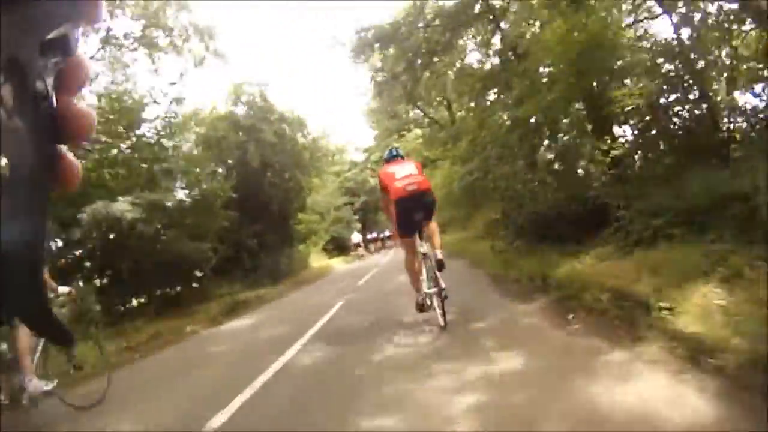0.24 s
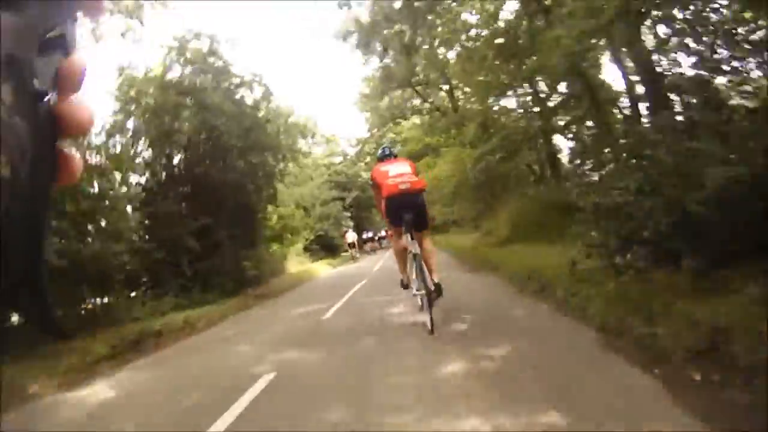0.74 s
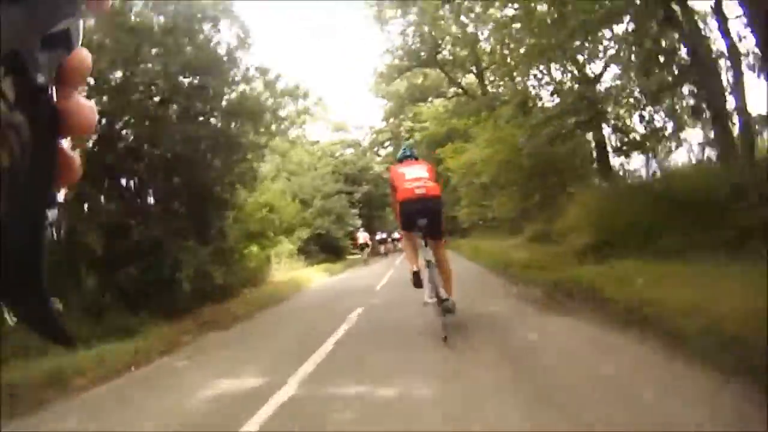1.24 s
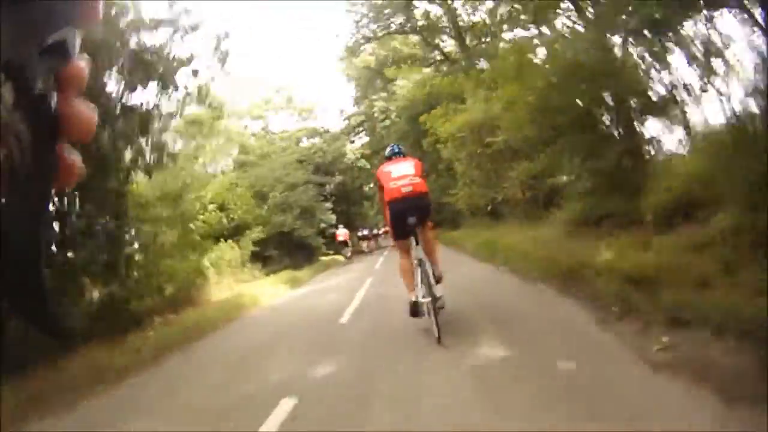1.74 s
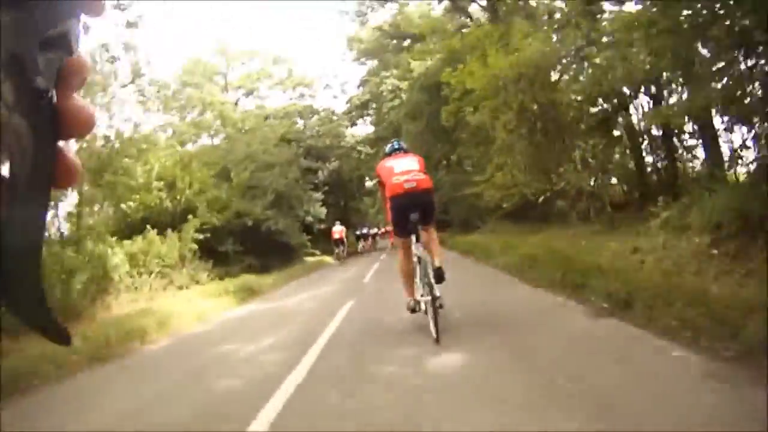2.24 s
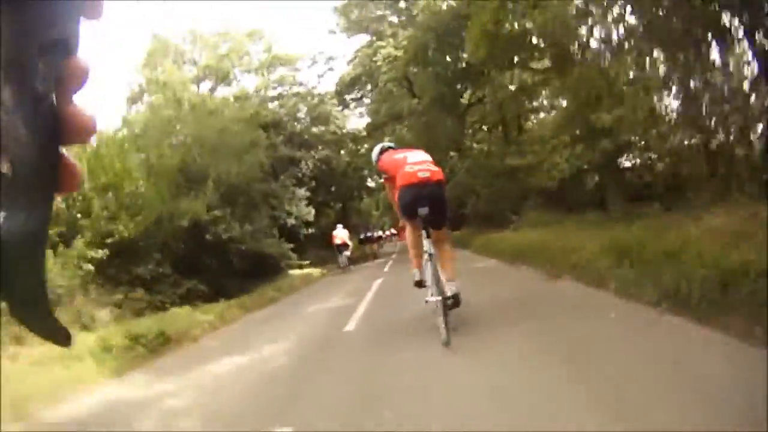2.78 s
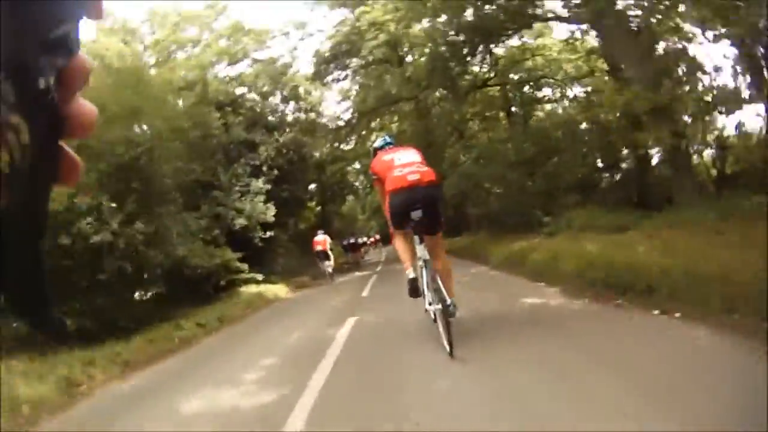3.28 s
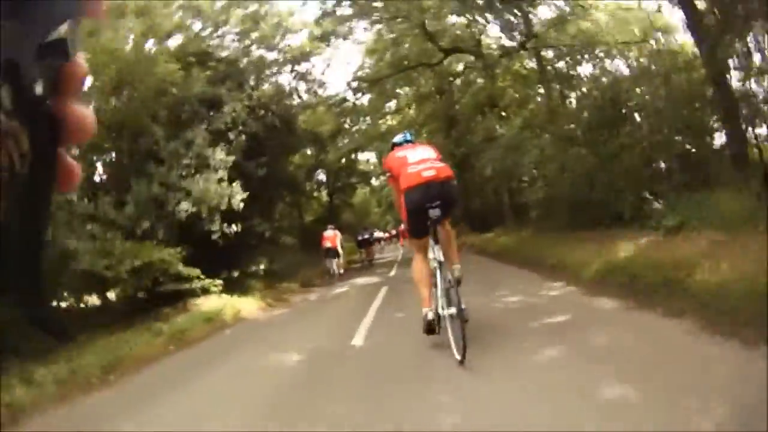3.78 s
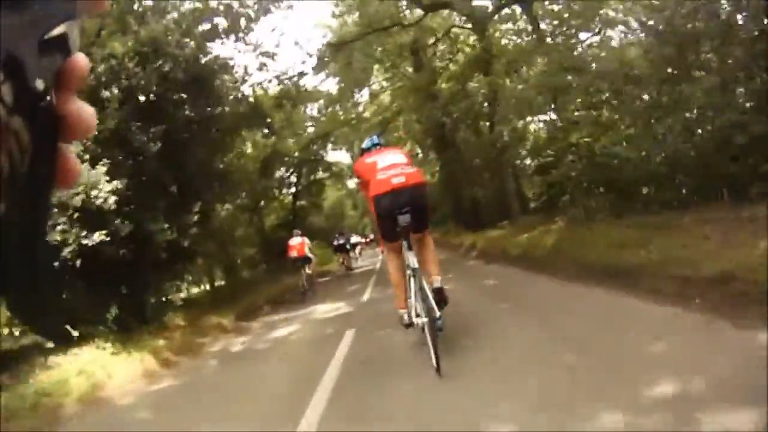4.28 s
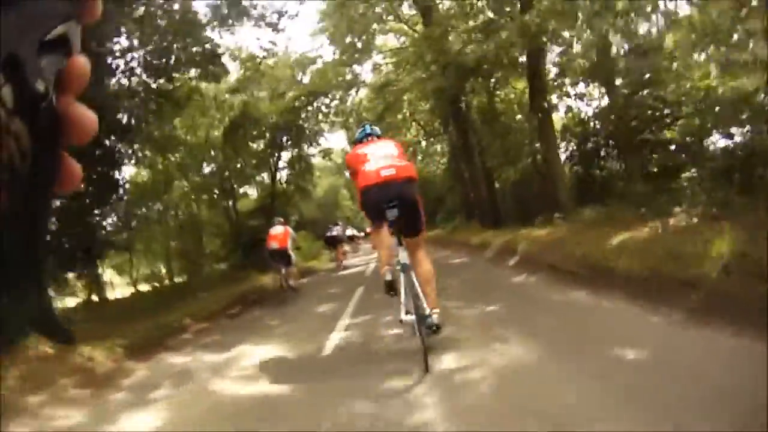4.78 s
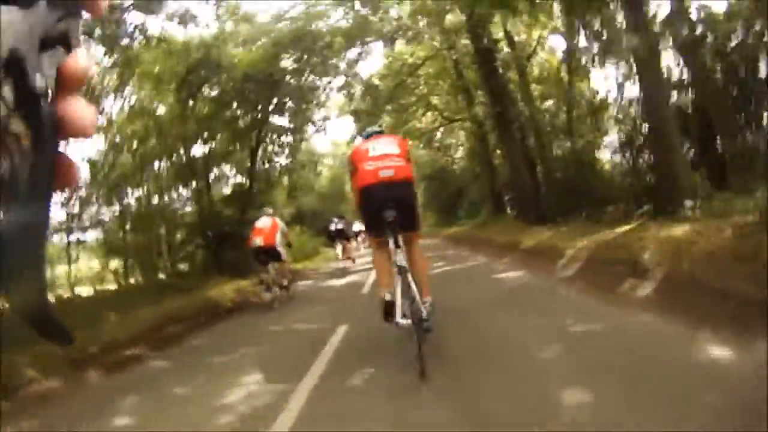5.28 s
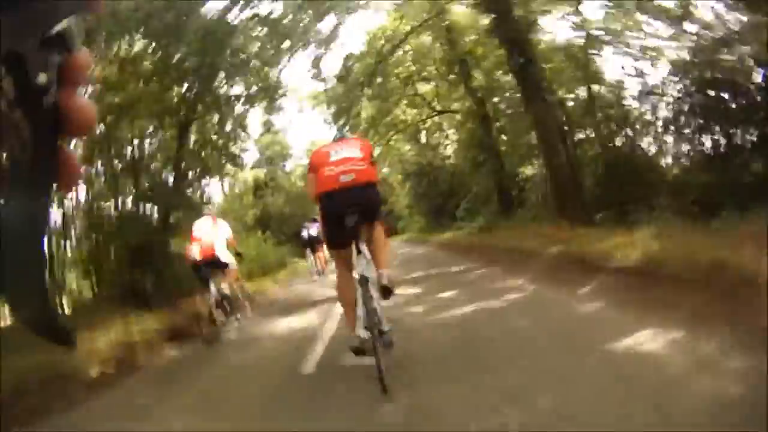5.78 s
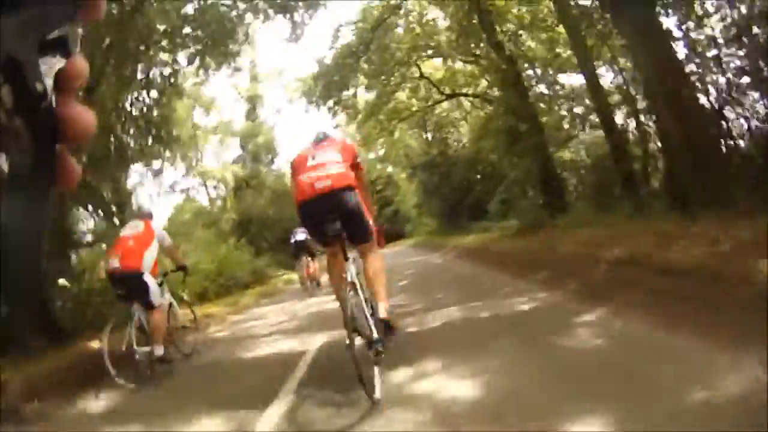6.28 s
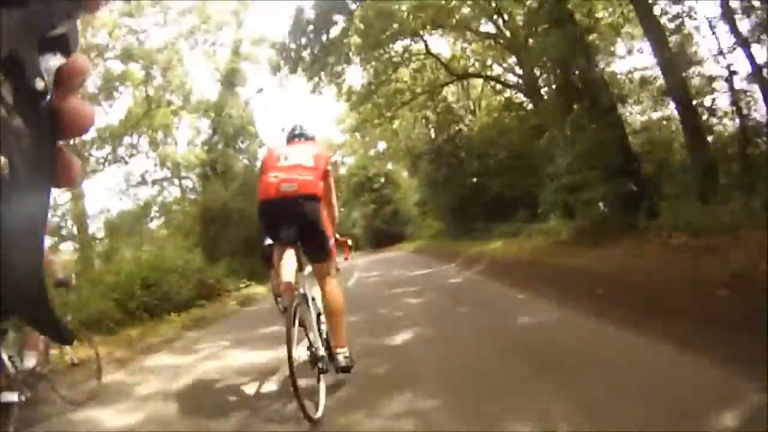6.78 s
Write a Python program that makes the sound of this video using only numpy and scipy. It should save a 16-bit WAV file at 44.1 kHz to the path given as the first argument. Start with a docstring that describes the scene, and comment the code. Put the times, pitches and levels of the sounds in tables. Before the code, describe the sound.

Hollow plastic knocks and gritty chatter burst irregularly over the steady dull rumble of a bicycle riding a rough paved lane, heard from the handlebar.

```python
"""A camera in a closed plastic case on a handlebar knocks and chatters as a road bike rolls along a tarmac lane.
Each bump throws it against one wall and back against the other: paired impulses of opposite sign excite the case.
Smaller jolts give single blows, and the road's grain drives panel resonances and fine crackling grit.
Hard edges tick, metal pings, a loose part clacks and parts scrape: short forces on damped resonators.
Below lies the rumble of tyres and frame, random contacts shaped by a spectrum, with the mount humming along."""
import sys
import numpy as np
from scipy import signal
from scipy.fft import rfft, irfft
from scipy.io import wavfile

SR = 44100
rng = np.random.default_rng(int(sys.argv[2]) if len(sys.argv) > 2 else 0)


def store_wav(level_fs):
    """Save 16-bit WAV to argv[1]."""
    pcm = np.round(np.clip(np.atleast_2d(level_fs), -1, 1) * 32767)
    wavfile.write(sys.argv[1], SR, pcm.T.astype(np.int16))


N = 310023
T = np.arange(N) / SR  # time in seconds

# Bumps that throw the camera. Each row: first return blow in seconds, its level in dB, level of the
# opening blow in dB, extra shaking in dB (only positive values act), number of throws.
BUMPS = [(0.0917, -6.5, -11, 2.5, 1), (0.157, -22, -6, 5.5, 1), (0.21, -16, -11, 15.5, 1),
         (0.2345, -10, -5.5, 12, 1), (0.515, -10.5, -14, 12, 2), (0.668, -15.5, -13, 2.5, 1),
         (1.1092, -7, -8.5, 15.5, 1), (1.2249, -6, -7, 3, 2), (1.359, -7.5, -13, 5, 2),
         (1.8216, -8, -11, 14, 2), (2.1387, -5, -10, 13, 1), (2.3841, -12.5, -14, 5.5, 1),
         (2.544, -18, -11, 7.5, 1), (2.642, -11, -26, 8.5, 2), (2.775, -8.5, -16, 9.5, 2),
         (2.824, -4, 1, -33, 1), (2.845, -1.5, 0.5, -2, 1), (2.938, -7, -6, 5.5, 1),
         (2.955, -16, -6, -9, 2), (2.9981, -3, -5, 4, 1), (3.063, -11, -20, -6, 1),
         (3.0823, -4, -5.5, 4.5, 1), (3.144, -6.5, -14, 4.5, 2), (3.1857, -6, -4, -4, 1),
         (3.208, -15, -7.5, 0.5, 1), (3.235, -10, -7.5, -4, 1), (3.744, -7.5, -6, -2.5, 2),
         (3.845, -4.5, -6, 2, 2), (4.1109, -10, -12, 8.5, 1), (4.2066, -18, -15, 4.5, 3),
         (4.4869, -14, -23, 13.5, 1), (4.691, -14, -19, 9, 1), (4.9172, -11, -9.5, 7.5, 1),
         (5.1001, -17, -10, -1, 1), (5.2853, -11.5, -14, 0.5, 1), (5.369, -9, -11, 4, 1),
         (5.461, -9.5, -10, 5, 2), (5.5465, -6.5, 3.5, 15.5, 2), (5.859, -13, -7, 5, 1),
         (6.1, -3, -6.5, 3.5, 1), (6.468, -14, -4.5, 6.5, 2), (6.6151, -0.5, 4.5, -5, 4),
         (6.7007, -4, -3, -9, 1), (6.758, -13, -11, 2, 3), (6.9942, -7, -3, 13, 1)]
# Response of the case to a blow. Each row: frequency in Hz, relative level in dB.
BLOW_SPECTRUM = [(35, -21.5), (70, -6.5), (135, -5.5), (200, 5), (420, 0), (700, -2), (1100, -5),
                 (1600, -18.5), (2700, -24), (3400, -34.5), (6500, -43.5), (11000, -53)]
# Fine grit between the rubbing plastic faces. Each row: frequency in Hz, relative level in dB.
GRIT_SPECTRUM = [(700, -1), (2400, 6), (3500, -4), (6000, -7), (11000, -23)]
# Resonances of the case panels. Each row: frequency in Hz, width in Hz, relative level in dB.
PANEL_MODES = [(308, 207, 0.5), (538, 514, -0.5), (911, 500, 2.5), (1235, 320, -4.5), (1582, 346, -7.5),
               (2480, 650, -14.5)]
# Ring of the handlebar mount. Each row: frequency in Hz, width in Hz, relative level in dB.
MOUNT_MODES = [(293.3, 47, -5.5)]
BOUNCE_HZ = 46.67  # how often the mount bounces after a jolt


def undb(db):
    """Amplitude gain is ten to the power of decibels over twenty."""
    return 10 ** (np.asarray(db) / 20)


def unit(x):
    """Normalise the effective value: rms 1."""
    return x / np.sqrt(np.mean(x ** 2))


def walk(rate):
    """Random fluctuation: `rate` normal values a second joined by straight lines; rms 1."""
    values = rng.standard_normal(4096)
    return unit(np.interp(T * rate, np.arange(4096), values))


def taps(times, sizes):
    """Ideal impacts: one impulse at each time in seconds."""
    samples = np.clip(times * SR, 0, N - 1).astype(int)
    return np.bincount(samples, sizes, N)


def grains(rate, scatter_db):
    """Shot noise: random contacts, `rate` a second, of uneven size and either direction; rms 1."""
    hit = rng.random(N) < rate / SR
    direction = rng.choice([-1, 1], N)
    size = undb(scatter_db * np.clip(rng.standard_normal(N), -2, 1))
    return unit(hit * direction * size)


def spurts(impulses, decay_s):
    """Exponential relaxation: each impulse starts a spurt that dies away."""
    # the tiny offset keeps the filter state from vanishing
    return signal.lfilter([1], [1, -np.exp(-1 / (decay_s * SR))], impulses + 1e-18)


def jolts(rate, decay_s):
    """Fluctuating contact pressure: decaying random jolts, `rate` a second; mean 1."""
    pressure = spurts(np.abs(grains(rate, scatter_db=-0.5)), decay_s)
    return pressure / pressure.mean()


def response(points, size=4096):
    """Minimum phase: the causal impulse response, peak 1, of a spectrum of (Hz, dB) points."""
    hz, db = np.transpose(points)
    grid = np.maximum(np.arange(size // 2 + 1) * SR / size, 1)
    level_db = np.interp(np.log(grid), np.log(hz), db)
    # folding the cepstrum onto positive times makes the response causal
    cepstrum = irfft(np.log(undb(level_db)))
    cepstrum[1:size // 2] *= 2
    cepstrum[size // 2 + 1:] = 0
    h = irfft(np.exp(rfft(cepstrum)))
    return h / np.abs(h).max()


def colour(x, points):
    """Linear response: convolve a force with the impulse response of a body."""
    return signal.fftconvolve(x, response(points))[:N]


def ring(x, modes):
    """Modal superposition: sum of resonances (Hz, width Hz, dB)."""
    out = 0
    for hz, width, db in modes:
        resonator = signal.iirpeak(hz, hz / width, fs=SR)
        out = out + undb(db) * signal.lfilter(*resonator, x)
    return out


def band(x, hz, width, order=2):
    """Heavily damped resonance: a band-pass of given width, its edges held below SR / 4."""
    edges = np.minimum(hz * np.exp(np.array([-.5, .5]) * width / hz), SR / 4)
    return signal.sosfilt(signal.butter(order, edges, "band", fs=SR, output="sos"), x)


def through_wall(x):
    """Transmission loss: the case wall dulls what lies above its cutoff."""
    return signal.sosfilt(signal.butter(5, 2356, fs=SR, output="sos"), x)  # Hz


def knocks(flight_s=.0049, flight_scatter=0.12, judder_s=0.0069, skid_s=0.00083):
    """Paired impacts: the camera crosses its play between two walls, so the blows have opposite signs."""
    back, back_db, first_db = throws().T
    flight_chance, skid_chance = rng.standard_normal((len(back), 2)).T
    first = back - flight_s * (1 + flight_scatter * flight_chance)
    out = taps(first, undb(first_db))
    home = taps(back, undb(back_db))
    # it skids against the wall just before it lands
    skid = taps(back - skid_s * np.exp(0.41 * skid_chance), undb(back_db))
    blows = colour(undb(-5.5) * out + undb(-11.5) * skid - undb(-1.0) * home, BLOW_SPECTRUM)
    # squaring makes harder blows crack brighter
    crack = colour(out ** 2 - home ** 2, GRIT_SPECTRUM) * undb(-28.5)
    # from first touch the faces judder and grind against each other
    touch = taps(first - 2 * skid_s, undb(first_db))
    contact = spurts(touch + undb(-6.5) * skid, judder_s)
    judder = rattle_panels(contact * rng.standard_normal(N), PANEL_MODES)
    grit = gritty(grains(rate=2200, scatter_db=14.5) * contact)
    return blows + crack + judder * undb(-36) + grit * undb(-52.0)


def throws():
    """Damped bouncing: the mount repeats a throw ever more weakly; rows (s, return dB, opening dB)."""
    fade_db = 1.16  # loss per throw
    rows = []
    for s, back_db, first_db, _, count in BUMPS:
        for k in range(round(count)):
            rows.append((s + k / BOUNCE_HZ, back_db - k * fade_db, first_db - k * fade_db))
    return np.array(rows)


def thuds():
    """Single impact: a smaller jolt knocks the camera against one wall only."""
    # Each row: start in seconds, level in dB.
    thud_rows = [(0.838, -21), (0.9606, -12), (1.1927, -8.5), (1.263, -7), (1.6969, -9.5), (1.732, -7.5),
                 (1.9895, -15.5), (3.2692, -13), (3.3584, -12), (3.4055, -11), (3.712, -12), (3.78, -13),
                 (3.823, -8.5), (3.936, -12), (4.192, -16), (4.2923, -17.5), (4.376, -14.5), (4.772, -15.5),
                 (4.9487, -11), (5.32, -12), (5.589, -7.5), (5.822, -11.5), (5.838, -10.5), (5.873, -10),
                 (6.045, -20), (6.3156, -12), (6.343, -12.5), (6.4301, -16), (6.452, -11), (6.5066, -8.5)]
    times, db = np.transpose(thud_rows)
    return -colour(taps(times, undb(db)), BLOW_SPECTRUM)


def chatter(shake, force, spot_q=7):
    """Random excitation: the shaken camera rattles the panels, spots, walls and grit of its case."""
    # the panels and the grit only join in fully when the shaking is hard, so calm stretches are dull
    crackle = rattle_panels(grains(rate=300, scatter_db=1.5) * force * shake ** 0.1, PANEL_MODES)
    # separate light knocks land on different spots, each with its own short ring
    spots = 0
    for hz in np.geomspace(520, 1350, 7):
        spots = spots + ring(grains(rate=8, scatter_db=2) * force, [(hz, hz / spot_q, 0)]) / hz
    # now and then the whole camera nudges a wall; its small play keeps these gentle
    nudge = grains(rate=32, scatter_db=2) * shake ** .7
    # grit crackles finely, grain by grain, and more so under pressure
    snaps = spurts(np.abs(grains(rate=1000, scatter_db=5)), decay_s=.0009)
    grit = gritty(snaps * rng.standard_normal(N) * force * shake ** 0.25)
    return (unit(crackle) * undb(-37.5) + unit(through_wall(spots)) * undb(-40.5)
            + unit(colour(nudge, BLOW_SPECTRUM)) * undb(-37.0) + grit * undb(-52.0))


def rattle_panels(force, panels, own=0.71, order=2):
    """Intermittent contact: one force drives all panels, each under its own varying pressure; rms 1."""
    limit = 3.0  # a panel can be pressed only so hard, in times the mean pressure before limiting
    out = 0
    for hz, width, db in panels:
        pressure = limit * np.tanh(jolts(rate=220, decay_s=0.0023) / limit)
        panel_force = force * (1 + own * (pressure - 1))
        out = out + undb(db) * unit(band(panel_force, hz, width, order))
    return unit(through_wall(out))


def gritty(snaps, patchy_db=4):
    """Time-varying spectrum: snapping grit whose bands wander in level independently; rms 1."""
    out = 0
    for hz in np.geomspace(1100, 9500, 7):
        out = out + band(snaps, hz, hz / 2, order=1) * undb(patchy_db * walk(200))
    return unit(colour(out, GRIT_SPECTRUM))


def ticks(crunch_s=0.0015):
    """Hard contact: meeting edges give an impulsive bright snap and a short decaying noise, the crunch."""
    # Each row: start in seconds, crunch level in dB, bright snap level in dB.
    tick_rows = [(0.0718, -18.5, -18.5), (0.0886, -26, -22), (0.121, -21, -19), (0.4932, -24.5, -15.5),
                 (1.146, -24, -27), (1.226, -28, -29), (1.639, -32, -29), (1.6905, -49, -19.5),
                 (1.8038, -25, -18), (2.0821, -18.5, -26), (2.815, -24, -19), (3.053, -38, -20),
                 (3.119, -20, -31), (3.577, -22, -24), (3.887, -51, -22), (3.976, -42, -19.5),
                 (4.2508, -31, -24), (4.431, -30.5, -22), (5.239, -20.5, -24), (5.2645, -22, -21),
                 (5.479, -18, -28), (5.8315, -36, -20), (5.874, -25, -33), (6.22, -48, -23.5),
                 (6.4657, -28, -16)]
    # Response of the case to a hard tick. Each row: frequency in Hz, relative level in dB.
    tick_spectrum = [(60, -31), (300, 14.5), (1450, 11.5), (2100, 0.5), (2900, -2), (3700, -15),
                     (5600, -19.5), (8000, -26), (11000, -27)]
    times, crunch_db, snap_db = np.transpose(tick_rows)
    crunch = spurts(taps(times, undb(crunch_db)), crunch_s) * rng.standard_normal(N)
    snap = colour(taps(times, undb(snap_db)), GRIT_SPECTRUM)
    return colour(crunch * undb(-4.0), tick_spectrum) + snap


def pings():
    """Impulse response: each tap briefly rings the damped modes of a small metal part."""
    # Each row: start in seconds, level in dB.
    ping_rows = [(1.1457, -2), (2.3843, -1), (3.628, -4), (3.987, -5.5), (4.7876, -5), (5.134, -6),
                 (5.542, 6), (6.545, 1)]
    # Ring of the metal part. Each row: frequency in Hz, width in Hz, relative level in dB.
    ping_modes = [(1320, 1130, 4.5), (2660, 500, 2), (4800, 300, -20)]
    times, db = np.transpose(ping_rows)
    strikes = taps(times, undb(db))
    return sum(undb(mode_db) * band(strikes, hz, width) for hz, width, mode_db in ping_modes)


def clacks(rebound_s=0.001505, rebound_db=-8):
    """Impact and rebound: a loose part on the handlebar strikes, rebounds once and rings."""
    # Each row: start in seconds, level in dB.
    clack_rows = [(0.65, -23.5), (0.789, -21.5), (1.087, -15), (2.527, -21), (3.863, -15), (4.379, -24),
                  (4.728, -25), (4.987, -24.5), (5.103, -18.5), (5.585, -15), (5.737, -20), (5.772, -20.5),
                  (6.017, -22), (6.123, -25), (6.979, -17)]
    # Ring of the loose part. Each row: frequency in Hz, width in Hz, relative level in dB.
    clack_modes = [(1215, 310, 33.5), (1606, 154, 9)]
    times, db = np.transpose(clack_rows)
    again = times + rebound_s * np.exp(0.15 * rng.standard_normal(len(times)))
    strikes = taps(times, undb(db)) + taps(again, undb(db + rebound_db))
    return through_wall(ring(strikes, clack_modes))


def scrapes():
    """Stick-slip friction: a quick run of slips rings the rubbing part and grinds the grit on it."""
    # Each row: centre in seconds, time from centre to 1/e in seconds, level in dB.
    scrape_rows = [(0.088, 0.015, -26), (0.364, 0.019, -22.5)]
    # Ring of the rubbing part. Each row: frequency in Hz, width in Hz, relative level in dB.
    scrape_modes = [(413, 430, -5.5), (1040, 440, -4.5), (1820, 410, -10.5)]
    pressure = sum(undb(db) * np.exp(-((T - s) / length) ** 2) for s, length, db in scrape_rows)
    slips = grains(rate=2500, scatter_db=2)
    body = rattle_panels(slips, scrape_modes, own=0.31, order=3)
    grit = unit(colour(slips, GRIT_SPECTRUM)) * undb(-25.5)
    return (body + grit) * pressure


def rumble(force):
    """Structure-borne sound: tyres drum on the tarmac, the frame passes on the lows, the mount hums."""
    # Rumble of tyres and frame. Each row: frequency in Hz, relative level in dB.
    rumble_spectrum = [(20, -26), (40, -26), (58, -4.5), (75, -7.5), (100, 0), (135, -1.5), (240, -7),
                       (400, -8), (1000, -14.5), (2000, -30.5), (5000, -54)]
    # harder at each jolt
    drumming = grains(rate=700, scatter_db=3.5) * force ** 0.66
    frame = unit(colour(drumming, rumble_spectrum))
    return frame * undb(-35.0) + unit(ring(frame, MOUNT_MODES)) * undb(-37.5)


def road_force(shake):
    """Modulated excitation: stones shake the bike in little spurts, paced by the bounce of the mount."""
    bounce_hz = BOUNCE_HZ * (1 + 0.1652 * walk(30))
    bounce = np.cos(2 * np.pi * np.cumsum(bounce_hz) / SR)
    pacing = undb(2 * bounce + 2.04 * walk(45))
    force = unit(shake * pacing * (jolts(rate=260, decay_s=0.0056) + 1.0))
    # the tyres cushion the sharpest jolts
    return np.tanh(force / 3)


def shaking():
    """Amplitude envelope: the tarmac shakes the bike all the time, and bumps add short swells."""
    # Coarseness of the tarmac between bumps. Each row: time in seconds, shaking in dB.
    road = [(0.0, -33.5), (0.41, -41), (0.85, -31), (1.05, -39.5), (1.27, -30.5), (1.52, -38), (2.0, -34),
            (2.42, -32.5), (2.73, -39), (2.85, -28.5), (3.1, -25.5), (3.48, -35), (3.82, -30.5), (4.2, -34),
            (4.63, -36), (5.46, -30.5), (5.62, -37.5), (5.9, -27), (6.28, -36), (6.52, -27), (6.73, -34),
            (7.03, -35)]
    attack_s, release_s = 0.052, 0.04
    swell_db = np.zeros(N)
    for s, _, _, extra_db, count in BUMPS:
        # builds up, lasts while the camera is thrown, dies away
        end = s + (round(count) - 1) / BOUNCE_HZ
        shape = np.interp(T, [s - attack_s, s, end, end + release_s], [0, 1, 1, 0])
        swell_db = np.maximum(swell_db, extra_db * shape)
    road_db = np.interp(T, *np.transpose(road))
    return undb(road_db + swell_db)


def scene():
    """Superposition: all sources add up, and the rattle also rings the mount; there is no room around."""
    shake = shaking()
    force = road_force(shake)
    rattle = chatter(shake, force) + knocks() + thuds() + ticks() + pings() + clacks() + scrapes()
    mount = undb(-5.0) * ring(rattle, MOUNT_MODES)
    return (rumble(force) + rattle + mount)[None]


def record(dry):
    """Clipping and band limits: peaks stop at full scale, and the microphone fades above 11 kHz."""
    soft = signal.sosfilt(signal.butter(4, 11000, fs=SR, output="sos"), np.clip(dry, -1, 1))
    # a steep cut above 15.5 kHz
    return signal.sosfilt(signal.ellip(8, .2, 70, 15500, fs=SR, output="sos"), soft)


dry = scene()
out = record(dry)
store_wav(out)
```